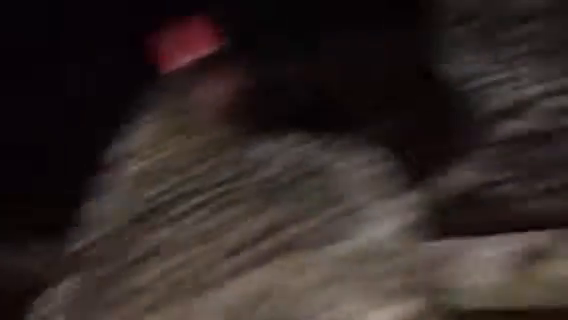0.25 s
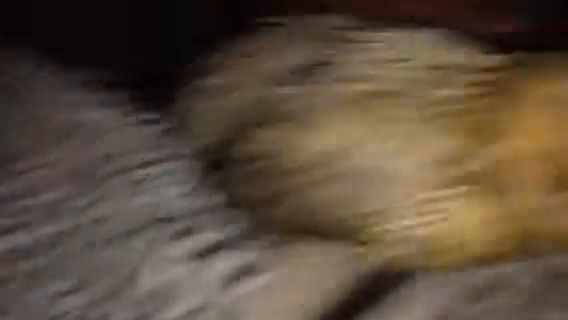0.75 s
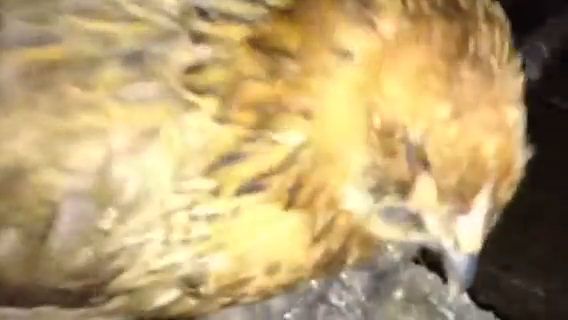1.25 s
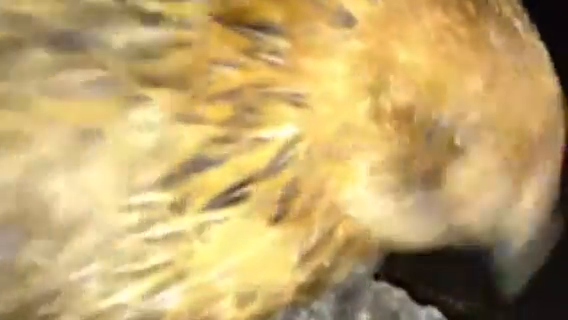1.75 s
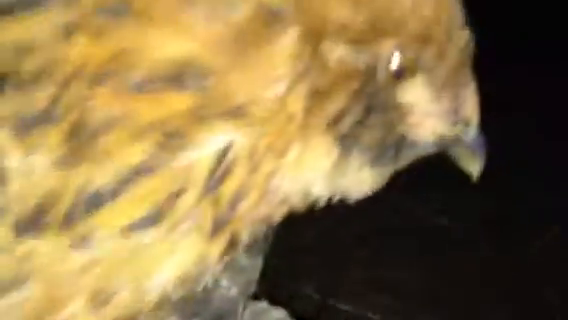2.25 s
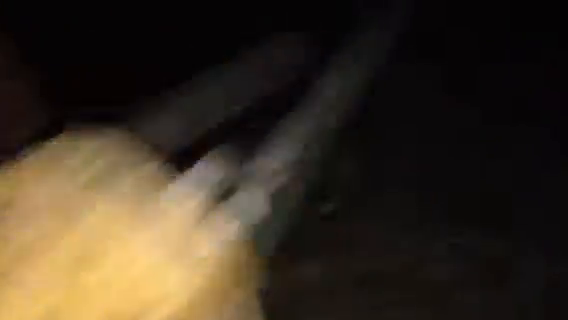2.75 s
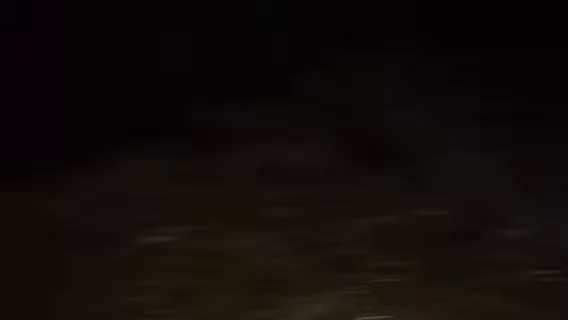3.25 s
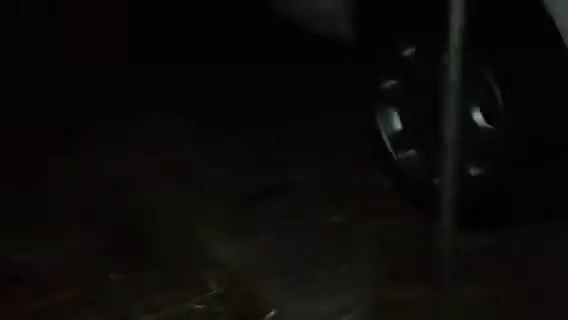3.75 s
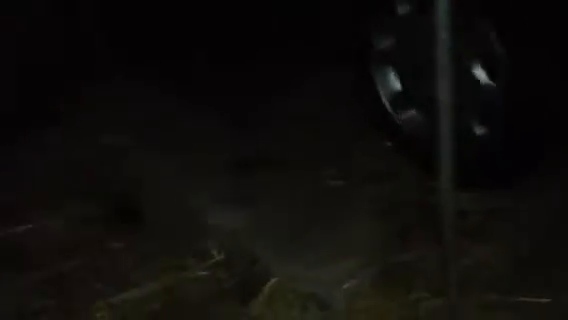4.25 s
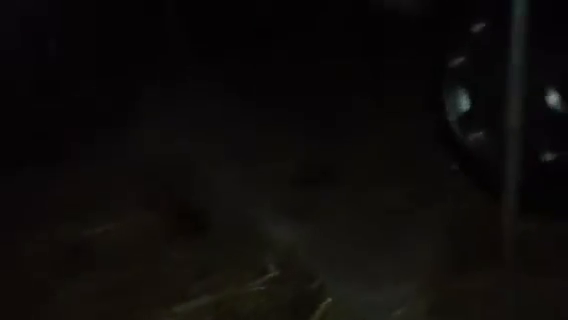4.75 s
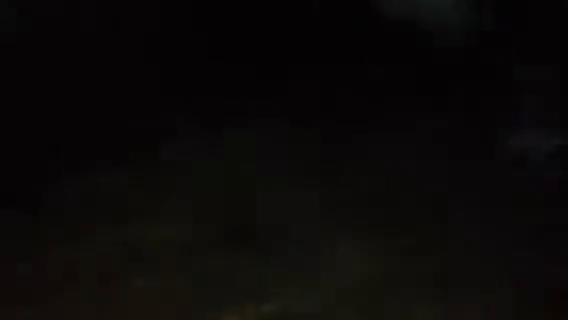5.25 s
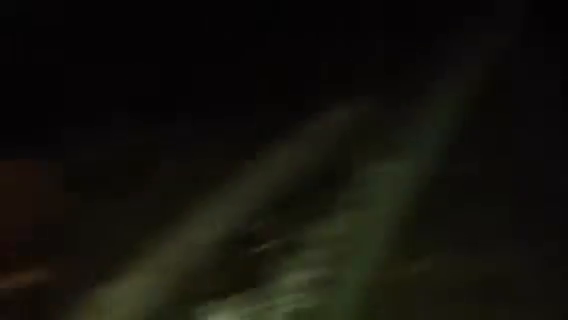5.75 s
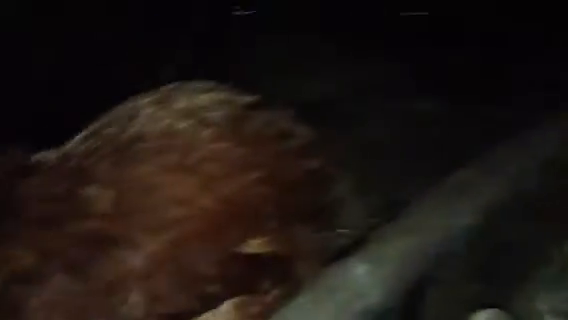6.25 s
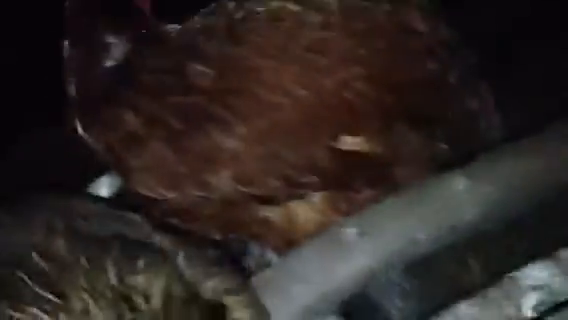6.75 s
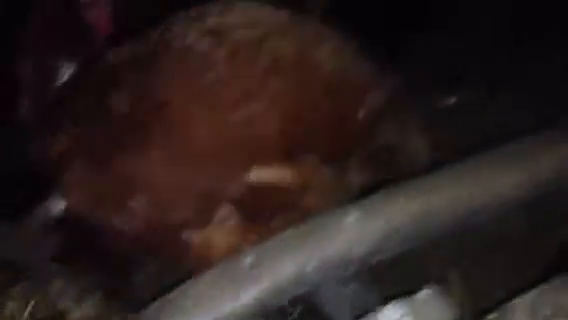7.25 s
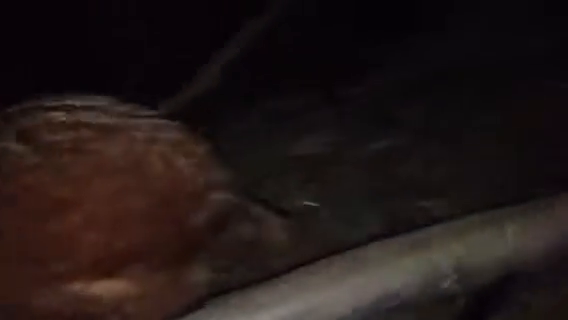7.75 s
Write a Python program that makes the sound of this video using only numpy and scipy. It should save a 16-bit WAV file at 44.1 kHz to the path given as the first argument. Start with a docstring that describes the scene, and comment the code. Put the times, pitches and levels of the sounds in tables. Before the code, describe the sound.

Many small tree frogs whistle in an overlapping night chorus, over shrill insects, with soft rustles and a few twig snaps.

```python
"""Coqui frogs call "co-qui" at night, all around a yard where hens roost.
Each frog whistles with its throat sac: a low "co" and, about a quarter second later, a rising "qui".
Near frogs sound clean; far ones join in, blurred by echoes from the trees. Insects shrill behind them.
A device carried in the hand adds rustles and soft bumps. There are also a few knocks, snaps of dry
leaves and twigs, two soft peeps and one faint, very high whistle."""
import sys
import numpy as np
from scipy import signal
from scipy.fft import rfft, irfft, next_fast_len
from scipy.io import wavfile

SR = 44100
rng = np.random.default_rng(int(sys.argv[2]) if len(sys.argv) > 2 else 0)


def master(y):
    """Save y as 16-bit WAV."""
    cut = np.clip(np.atleast_2d(y).T, -1, 1)
    pcm = np.round(cut * 32767)  # scale
    wavfile.write(sys.argv[1], SR, pcm.astype(np.int16))


N = 353266
T = np.arange(N) / SR

# The near frogs' low "co" notes: start_s, length_s, start_hz, end_hz, level_db (before the tree echo)
CO_CALLS = [(0.045, 0.15, 1564, 1524, -48), (0.441, 0.095, 1472, 1475, -53.5),
            (0.521, 0.097, 1450, 1436, -53), (0.597, 0.099, 1515, 1395, -47),
            (0.654, 0.067, 1583, 1567, -59), (0.89, 0.13, 1420, 1426, -55.5),
            (1.224, 0.071, 1485, 1380, -55), (1.346, 0.069, 1600, 1562, -51),
            (1.403, 0.11, 1470, 1380, -63), (1.627, 0.089, 1638, 1567, -53.5),
            (1.83, 0.065, 1473, 1468, -54.5), (2.09, 0.094, 1474, 1416, -58.5),
            (2.18, 0.05, 1620, 1590, -62), (2.252, 0.16, 1499, 1443, -44), (2.64, 0.1, 1520, 1452, -54),
            (2.948, 0.052, 1650, 1670, -57), (3.089, 0.089, 1474, 1398, -55),
            (3.39, 0.066, 1574, 1541, -52.5), (3.44, 0.086, 1533, 1469, -45.5),
            (3.551, 0.2, 1585, 1570, -60), (3.813, 0.098, 1443, 1315, -55.5),
            (3.915, 0.081, 1480, 1380, -47.5), (4.249, 0.14, 1431, 1399, -54.5),
            (4.37, 0.14, 1542, 1473, -56), (4.529, 0.084, 1650, 1526, -51.5),
            (4.637, 0.13, 1504, 1449, -34.5), (4.976, 0.064, 1566, 1623, -52.5),
            (4.982, 0.061, 1474, 1382, -51), (5.21, 0.087, 1467, 1426, -56.5),
            (5.356, 0.082, 1560, 1560, -52.5), (5.66, 0.088, 1397, 1310, -58),
            (6.012, 0.17, 1461, 1418, -54), (6.303, 0.16, 1564, 1456, -49.5),
            (6.649, 0.1, 1474, 1439, -51.5), (6.86, 0.12, 1560, 1474, -52),
            (7.182, 0.13, 1505, 1450, -37.5), (7.368, 0.083, 1420, 1338, -52),
            (7.566, 0.17, 1450, 1379, -48), (7.671, 0.065, 1580, 1555, -53), (7.8, 0.14, 1490, 1440, -58.5),
            (7.93, 0.061, 1510, 1443, -53.5)]
# Their rising "qui" notes: start_s, length_s, start_hz, end_hz, level_db (before the tree echo)
QUI_CALLS = [(-0.075, 0.12, 2176, 2611, -28), (0.017, 0.089, 2490, 2777, -40.5),
             (0.14, 0.076, 2360, 2563, -50), (0.317, 0.097, 2326, 2687, -44), (0.34, 0.1, 2544, 2814, -47),
             (0.397, 0.1, 2329, 2676, -43), (0.58, 0.095, 2344, 2615, -63), (0.71, 0.07, 2380, 2574, -52),
             (0.736, 0.099, 2515, 2820, -50.5), (0.859, 0.125, 2181, 2705, -40),
             (0.897, 0.071, 2730, 2990, -52), (0.914, 0.077, 2330, 2545, -54),
             (1.157, 0.11, 2256, 2650, -47), (1.23, 0.13, 2390, 2754, -51), (1.447, 0.098, 2120, 2500, -55),
             (1.559, 0.11, 2512, 2758, -48.5), (1.709, 0.1, 2370, 2650, -55),
             (1.913, 0.098, 2465, 2780, -52.5), (1.955, 0.097, 2600, 3020, -53.5),
             (2.085, 0.076, 2236, 2670, -51), (2.346, 0.11, 2313, 2704, -53),
             (2.513, 0.11, 2197, 2720, -32.5), (2.636, 0.084, 2460, 2637, -50),
             (2.913, 0.089, 2296, 2690, -46.5), (2.944, 0.081, 2580, 2923, -50),
             (3.099, 0.084, 2407, 2660, -50.5), (3.212, 0.059, 2755, 3087, -56),
             (3.362, 0.11, 2323, 2620, -49.5), (3.464, 0.092, 2608, 2816, -51.5),
             (3.661, 0.081, 2497, 2796, -49), (3.697, 0.092, 2360, 2644, -44),
             (4.047, 0.13, 2394, 2590, -49.5), (4.096, 0.13, 2560, 2890, -59),
             (4.174, 0.13, 2205, 2656, -43.5), (4.217, 0.097, 2156, 2642, -42.5),
             (4.508, 0.12, 2382, 2750, -46), (4.609, 0.15, 2467, 2780, -50.5),
             (4.889, 0.058, 2820, 3023, -45), (4.896, 0.128, 2158, 2687, -30), (5.24, 0.1, 2476, 2677, -50),
             (5.506, 0.1, 2360, 2660, -53), (5.618, 0.098, 2674, 3010, -59),
             (5.772, 0.087, 2570, 2850, -53.5), (5.781, 0.088, 2156, 2484, -50),
             (5.977, 0.14, 2399, 2663, -48.5), (6.118, 0.0764, 2650, 3040, -52.5),
             (6.279, 0.12, 2235, 2694, -50), (6.564, 0.069, 2550, 2860, -47.5),
             (6.558, 0.14, 2212, 2664, -44), (6.696, 0.07, 2462, 2707, -49),
             (6.89, 0.15, 2336, 2630, -50.5), (7.061, 0.12, 2405, 2916, -50.5),
             (7.125, 0.14, 2392, 2693, -46), (7.187, 0.095, 2570, 2775, -46),
             (7.446, 0.105, 2155, 2584, -32), (7.54, 0.066, 2438, 2800, -42.5),
             (7.668, 0.15, 2280, 2634, -55.5), (7.832, 0.099, 2240, 2684, -41.5),
             (7.89, 0.079, 2570, 2800, -42), (7.908, 0.081, 2342, 2690, -44.5)]


def amp(db):
    """Turns decibels into a number to multiply a sound by."""
    return 10 ** (np.asarray(db) / 20)


def unit(x):
    """Scales a signal so that its average size (rms) is 1."""
    return x / np.sqrt(np.mean(x ** 2) + 1e-20)


def add(mix, start_s, sound):
    """Mixes a sound in at start_s, dropping whatever falls outside the mix."""
    start = round(start_s * SR)
    sound = sound[max(-start, 0):]
    part = mix[max(start, 0):][:len(sound)]
    part += sound[:len(part)]


def decay(t, fade_s):
    """A fade that falls 60 dB in fade_s seconds."""
    return np.exp(-np.log(1000) * t / fade_s)


def colour(x, points):
    """Shapes bass and treble along (pitch_hz, gain_db) points; the result has average size 1."""
    hz, db = np.transpose(points)
    size = next_fast_len(len(x))
    freqs = np.fft.rfftfreq(size, 1 / SR)
    gain = amp(np.interp(np.log(freqs + 1), np.log(hz), db))
    return unit(irfft(rfft(x, size) * gain, size)[:len(x)])


def drift(per_s):
    """A random wander of average size 1 that heads for a new value per_s times a second."""
    return unit(np.interp(T * per_s, np.arange(4000), rng.standard_normal(4000)))


def tree_echoes(fade_s, build_s):
    """Trunks and leaves send back many scattered echoes that build up and die away."""
    t = np.arange(SR // 2) / SR
    echoes = rng.standard_normal(len(t)) * (rng.random(len(t)) < .03)
    echoes *= decay(t, fade_s) * (1 - np.exp(-t / build_s))
    return echoes / np.linalg.norm(echoes)


def note(length_s, start_hz, end_hz, bend, swell, rise_s, fall_s, scoop):
    """Phase and loudness curve of an animal's note: it scoops up to pitch, then glides ever slower."""
    progress = np.linspace(0, 1, int(length_s * SR))
    glide_hz = start_hz + (end_hz - start_hz) * progress ** bend
    hz = glide_hz * (1 - scoop * np.exp(-progress * length_s / .0036))
    edges = np.clip(length_s * np.minimum(progress / rise_s, (1 - progress) / fall_s), 0, 1)
    hump = np.exp(-swell * (progress - .66) ** 2)
    return 2 * np.pi * np.cumsum(hz) / SR, unit(hump * np.sin(edges * np.pi / 2))


def voice(phase, second_db, third_db):
    """A pure tone plus overtones at two and three times its pitch."""
    return np.sin(phase) + amp(second_db) * np.sin(2 * phase) + amp(third_db) * np.sin(3 * phase)


def night_air(level_db=-68):
    """The low, steady wash of the night."""
    # Tone of the wash: pitch_hz, gain_db
    air_tone = [(25, -21), (60, -29), (90, -15), (140, -2.5), (220, 1), (350, -2.5), (700, -6.5),
                (1200, -12), (3500, -16.5), (4300, -8.5), (4900, -15), (8000, -13), (10000, -22),
                (15000, -12.5)]
    return amp(level_db) * colour(rng.standard_normal(N), air_tone)


def insects(pitch_hz=5490, half_width_hz=225, throb_db=1.5):
    """Countless distant wings ringing near one pitch merge into a narrow, shrill band of noise."""
    # Loudness of the shrilling: time_s, level_db
    levels = [(0, -66.5), (2.5, -65.5), (3.9, -65.5), (5.2, -67.5), (8, -66.5)]
    size = next_fast_len(N)
    freqs = np.fft.rfftfreq(size, 1 / SR)
    band = np.exp(-((freqs - pitch_hz) / half_width_hz) ** 4 / 2)
    shrill = irfft(rfft(rng.standard_normal(size)) * band, size)[:N]
    return amp(np.interp(T, *np.transpose(levels)) + throb_db * drift(30)) * unit(shrill)


def high_whistle(waver=.008, flicker_db=3, rasp_hz=370):
    """A faint, very high, raspy tone that arches and falls away."""
    # Path of the whistle: time_s, pitch_hz, level_db, rasp_radians (size of a fast wobble)
    path = [(.17, 8240, -85, 0), (.26, 9350, -77, 0.1), (.335, 9480, -81, .1), (.401, 9750, -75, .6),
            (.47, 9200, -70, 1.5), (.53, 8800, -74, .7), (.6, 8100, -82, .2), (.7, 8080, -83, .1),
            (.77, 7650, -85, 0.089)]
    times, hz, db, rasp = np.transpose(path)
    phase = 2 * np.pi * np.cumsum(np.interp(T, times, hz) * (1 + waver * drift(450))) / SR
    phase += np.interp(T, times, rasp) * np.sin(2 * np.pi * rasp_hz * T)
    loudness = amp(np.interp(T, times, db) + flicker_db * drift(72.3))
    return loudness * unit(np.sin(phase)) * (T > times[0]) * (T < times[-1])


def rustle(clicks_per_s=900, click_spread_db=2.9, click_gain=.7, flicker_db=1.0):
    """Cloth fibres catch and slip: a hiss with tiny clicks that swells with each stroke."""
    # Steady rubbing of hand and clothes: time_s, level_db
    rubbing = [(0, -78.5), (.75, -74), (1, -68), (1.65, -68), (2, -64), (2.5, -56), (2.65, -64),
               (3.15, -64.5), (3.35, -70), (4.25, -75), (4.55, -63), (4.87, -58.5), (5.3, -54.5),
               (5.65, -61), (5.9, -67), (6.4, -63.5), (6.9, -68), (8, -64.5)]
    # Single brisk strokes of cloth: start_s, length_s, level_db
    strokes = [(0.91, 0.13, -66.5), (1.08, 0.074, -63), (1.216, 0.14, -64.5), (1.696, 0.11, -56),
               (1.77, 0.1, -60.5), (1.911, 0.26, -56), (2.132, 0.095, -60), (2.23, 0.078, -58.5),
               (2.518, 0.1, -55), (2.687, 0.095, -60), (2.79, 0.12, -58.5), (4.573, 0.18, -57.5),
               (5.99, 0.15, -60.5), (6.48, 0.19, -60.5), (7.103, 0.17, -57.5), (7.525, 0.042, -61.5),
               (7.745, 0.3, -60)]
    # Tone of the cloth above the deep bass: pitch_hz, gain_db
    cloth_tone = [(150, -3), (300, -3), (700, -2.5), (1300, -2.5), (3000, 4), (4200, 1), (5200, -2),
                  (7800, 4.5), (10000, -0.5), (13000, 1), (15300, -0.5)]
    power = amp(np.interp(T, *np.transpose(rubbing))) ** 2
    for start_s, length_s, db in strokes:
        progress = np.linspace(0, 1, int(length_s * SR))
        swell = unit(np.sin(np.pi * progress ** .6))
        add(power, start_s, (amp(db) * swell) ** 2)
    sizes = rng.choice([-1, 1], N) * amp(click_spread_db * np.minimum(rng.exponential(1, N), 5))
    clicks = sizes * (rng.random(N) < clicks_per_s / SR)
    hiss = rng.standard_normal(N) + click_gain * unit(clicks)
    rub = colour(hiss, [(40, -42), (90, -25)] + cloth_tone)
    return rub * np.sqrt(power) * amp(flicker_db * drift(60))


def finger_bumps(sag=.13):
    """Fingers shift on the device's case: low, soft thuds that sag in pitch."""
    # The thuds: start_s, length_s, pitch_hz, level_db
    thuds = [(.41, 0.13, 230, -72.5), (1.55, .098, 134, -75.5), (1.569, 0.043, 207, -67),
             (1.67, 0.077, 214, -72.5), (1.971, 0.05, 193, -65.5), (2.19, 0.11, 165.5, -74),
             (2.253, 0.022, 256, -64.5), (2.396, 0.02, 197, -64), (2.41, 0.042, 126, -76),
             (2.516, 0.041, 225, -64), (2.669, 0.074, 195, -70), (4.851, 0.14, 277, -76),
             (6.514, 0.21, 216, -73.5)]
    out = np.zeros(N)
    for start_s, length_s, hz, db in thuds:
        progress = np.linspace(0, 1, int(length_s * SR))
        phase = 2 * np.pi * np.cumsum(hz * (1 + sag * (.5 - progress))) / SR
        swell = np.sin(np.pi * progress ** .77) ** 2
        add(out, start_s, amp(db) * unit(swell * np.sin(phase)))
    return out


def knocks(scuff_db=-6, scuff_fade_s=.53, rise_s=.00055):
    """Each dull blow makes wood ring briefly at a few pitches, and scuffs a little."""
    # The blows: start_s, gain_db, pitch_factor (multiplies the wood's pitches)
    blows = [(1.054, -64.5, 0.8), (2.228, -66, 0.83), (3.0256, -78, 1), (4.587, -61, 0.81),
             (4.621, -66, 0.97), (5.623, -67, 1), (5.664, -69, 0.97), (5.674, -62.5, .8),
             (5.726, -65.5, 1.07), (5.77, -67, 1.05), (5.814, -56, 1.15), (5.838, -56, 0.85),
             (6.013, -60, 1.02), (6.05, -66, 0.96), (6.51, -61.5, 1), (6.587, -57, 0.97), (7.19, -60, 0.8)]
    # The tones the wood rings with: pitch_hz, gain_db, fade_s
    wood_tones = [(483, 14, 0.021), (648, 3.5, 0.12), (832, 13.5, 0.04), (1090, 10.5, 0.054),
                  (1920, 26.5, 0.011), (3560, -15, .025)]
    scuff_tone = [(150, -22), (300, 8), (520, -3), (1050, 5), (2000, -43), (4000, 8), (8000, -78)]
    out, t = np.zeros(N), np.arange(SR // 5) / SR
    for start_s, db, pitch in blows:
        ring = sum(amp(tone_db) * decay(t, fade_s) * np.sin(2 * np.pi * (hz * pitch * t + rng.random()))
                   for hz, tone_db, fade_s in wood_tones)
        scuff = amp(scuff_db) * colour(rng.standard_normal(len(t)), scuff_tone) * decay(t, scuff_fade_s)
        add(out, start_s, amp(db) * (ring / 2 + scuff) * (1 - np.exp(-t / rise_s)))
    return out


def snaps():
    """Dry leaves and twigs break with one sharp click, then splinter briefly."""
    # The breaks: start_s, level_db, fade_s
    breaks = [(1.42, -57, 0.11), (3.0268, -32.5, 0.0068), (3.025, -42, 0.18), (3.179, -50.5, 0.032),
              (3.464, -56, 0.031), (4.246, -54, 0.0079), (4.522, -55, 0.02), (4.623, -43, 0.011),
              (5.128, -50, 0.015), (5.218, -48, 0.02), (5.339, -42.5, 0.0072), (5.485, -50, .012),
              (5.563, -48, 0.03), (5.575, -48, 0.013), (5.666, -46, 0.026), (5.84, -51, 0.044),
              (6.019, -53, 0.02), (6.22, -48, 0.0053), (6.587, -47, 0.032), (6.77, -50, 0.017),
              (7.16, -51, .02), (7.952, -48.5, 0.0087)]
    crack_tone = [(200, -20), (1200, 20.5), (4000, 14), (8000, 13.5), (15000, 1)]
    out, t = np.zeros(N), np.arange(SR // 8) / SR
    for start_s, db, fade_s in breaks:
        splinters = rng.standard_normal(len(t))
        splinters[8] = 4  # the opening click
        add(out, start_s, amp(db) * colour(splinters, crack_tone) * decay(t, fade_s))
    return out


def peeps(hoarse_radians=.25, flutter=.35):
    """Soft, slightly hoarse rising notes with a short echo, probably from the roosting hens."""
    # The peeps: start_s, length_s, start_hz, end_hz, level_db, echo_gain
    peep_notes = [(-.016, 0.04, 670, 960, -51, .12), (5.89, 0.11, 1555, 1630, -42.5, .45)]
    out = np.zeros(N)
    for start_s, length_s, start_hz, end_hz, db, echo_gain in peep_notes:
        phase, loudness = note(length_s, start_hz, end_hz,
                               bend=.91, swell=3, rise_s=.0065, fall_s=.049, scoop=0)
        phase += hoarse_radians * drift(240)[:len(phase)]
        loudness *= amp(db) * np.exp(flutter * drift(90)[:len(phase)])
        peep = loudness * voice(phase, second_db=-12.5, third_db=-25)
        add(out, start_s, peep)
        add(out, start_s, echo_gain * signal.fftconvolve(peep, tree_echoes(fade_s=.3, build_s=.0021)))
    return out


def far_frogs(near_calls, start_hz, end_hz, pitch_spread, length_s, join_db, alone_db, join_every,
              frogs=64, calls_alone=4, fade_s=.42):
    """Distant frogs, heard only as tree echoes, take turns joining the near ones and also call alone."""
    out = np.zeros(N)
    for frog in range(frogs):
        offset = np.arcsin(2 * (frog + rng.random()) / frogs - 1) / (np.pi / 2)  # -1 to 1, often near 0
        pitch = 1 + pitch_spread * offset
        phase, loudness = note(length_s, start_hz * pitch, end_hz * pitch,
                               bend=.6, swell=.31, rise_s=.00078, fall_s=.012, scoop=.054)
        call = signal.fftconvolve(loudness * np.sin(phase), tree_echoes(fade_s, build_s=.018))
        boost_db = rng.uniform(1.5, 2.5)  # each frog's own, on top of join_db and alone_db
        call *= amp(boost_db) * np.sqrt(len(phase)) / np.linalg.norm(call)
        for start_s, *_, caller_db in near_calls[frog % join_every::join_every]:
            lag_s = .025 + .042 * rng.uniform(-1, 1)
            follow_db = .14 * (caller_db + 29)  # a louder caller gets a slightly louder answer
            add(out, start_s + lag_s, amp(join_db + follow_db) * call)
        moments = (np.arange(calls_alone) + rng.random()) / calls_alone
        for start_s in moments * (N / SR + fade_s) - fade_s:
            add(out, start_s, amp(alone_db) * call)
    return out


def far_chorus():
    """The distant frogs' low and rising notes come in waves that follow the near callers."""
    co = far_frogs(CO_CALLS, start_hz=1534, end_hz=1408, pitch_spread=.0954, length_s=.1,
                   join_db=-65.8, alone_db=-63.7, join_every=16)
    qui = far_frogs(QUI_CALLS, start_hz=2349, end_hz=2720, pitch_spread=.12, length_s=.12,
                    join_db=-61.3, alone_db=-57.7, join_every=13)
    return co + qui


def near_note(length_s, start_hz, end_hz, level_db, *, clear_db, max_echo_share, fade_s,
              rise_s, overtones_db, flutter, bounce_gain, bounce_s, **shape):
    """One almost pure whistle of a throat sac, with tree echoes; notes above clear_db have little echo."""
    echo_share = max_echo_share / (1 + amp(level_db - clear_db) ** 3)
    # Leaves in the way scatter the sound: farther notes start softer and waver more.
    phase, loudness = note(length_s, start_hz, end_hz, rise_s=rise_s + .03 * echo_share ** 2, **shape)
    steps = T[:len(phase)] * 130  # 130 random turns a second
    wander = [np.interp(steps, np.arange(100), row) for row in rng.standard_normal((2, 100))]
    level_waver, phase_waver = flutter * np.sqrt(echo_share) * np.array(wander)
    tone = loudness * np.exp(level_waver) * voice(phase + phase_waver, *overtones_db)
    # A gliding note throbs as it overlaps its own bounce off the ground or a wall.
    lag = int(bounce_s * rng.uniform(.75, 1.25) * SR)
    tone = unit(np.pad(tone, (0, lag)) + bounce_gain * np.pad(tone, (lag, 0)))
    echo = signal.fftconvolve(tone, tree_echoes(fade_s, build_s=.017))
    echo *= np.linalg.norm(tone) / np.linalg.norm(echo)
    direct = np.pad(tone, (0, len(echo) - len(tone)))
    return amp(level_db) * (direct + np.sqrt(echo_share / (1 - echo_share)) * echo)


def near_frogs():
    """The nearby callers: a "co" usually sinks a little and levels off; a "qui" sweeps up."""
    co = dict(bend=.55, swell=.3, rise_s=.0096, fall_s=.034, scoop=.05, overtones_db=(-32, -42),
              clear_db=-46.5, max_echo_share=.28, fade_s=.55,
              flutter=.45, bounce_gain=.06, bounce_s=.0015)
    qui = dict(bend=.7, swell=2.3, rise_s=.005, fall_s=.008, scoop=.12, overtones_db=(-55, -41),
               clear_db=-35.5, max_echo_share=.42, fade_s=.36,
               flutter=.56, bounce_gain=.5, bounce_s=.011)
    out = np.zeros(N)
    for calls, settings in ((CO_CALLS, co), (QUI_CALLS, qui)):
        for start_s, *call in calls:
            add(out, start_s, near_note(*call, **settings))
    return out


def scene():
    """Near and far frogs over insects and night air, with the small noises of moving about."""
    bass_cut = signal.butter(2, 130, "high", fs=SR, output="sos")
    small_hits = signal.sosfilt(bass_cut, knocks() + snaps())  # too small to give bass
    night = near_frogs() + far_chorus() + insects() + night_air()
    movement = rustle() + small_hits + finger_bumps()
    return (night + movement + high_whistle() + peeps())[None]


def record(dry):
    """Cuts away the highest treble, above 15400 Hz."""
    treble_cut = signal.firwin(511, 15400, window=("kaiser", 9), fs=SR)
    return signal.oaconvolve(dry, treble_cut[None], "same")


dry = scene()
out = record(dry)
master(out)
```